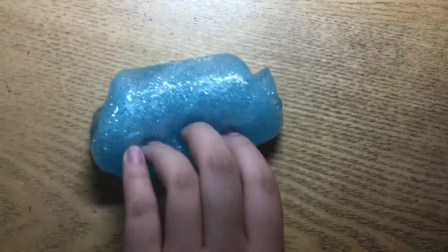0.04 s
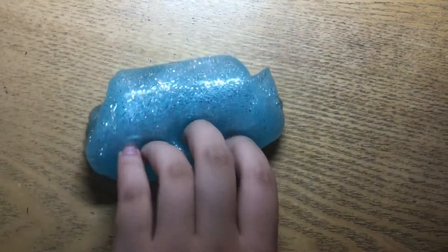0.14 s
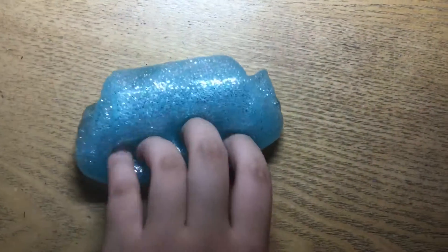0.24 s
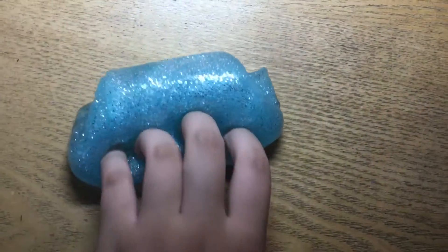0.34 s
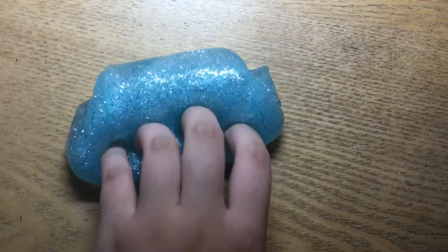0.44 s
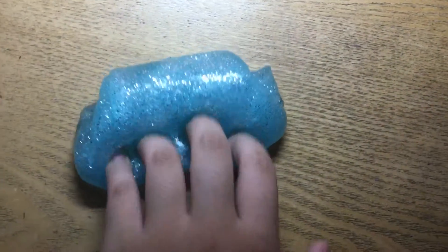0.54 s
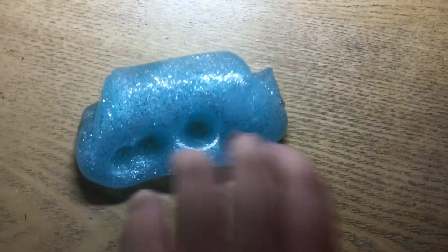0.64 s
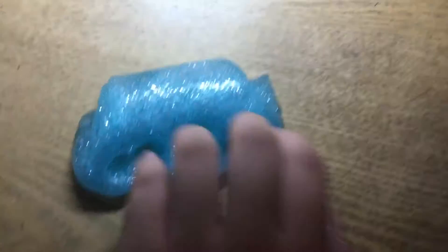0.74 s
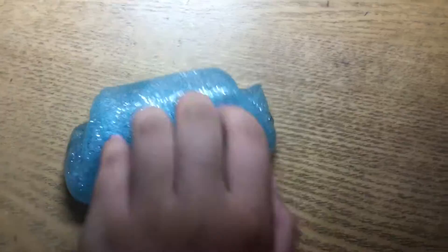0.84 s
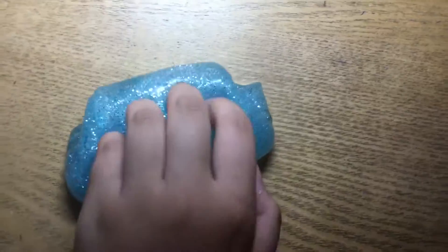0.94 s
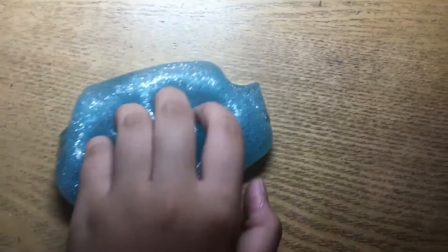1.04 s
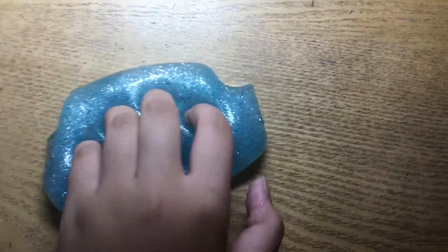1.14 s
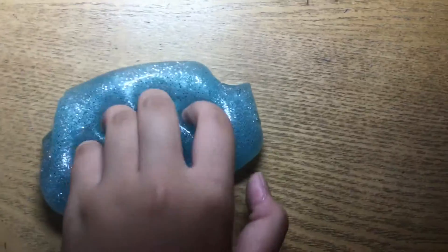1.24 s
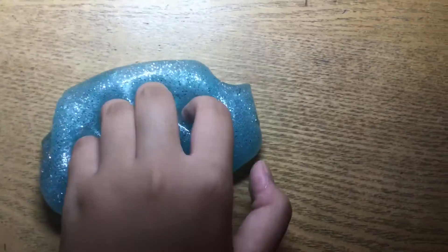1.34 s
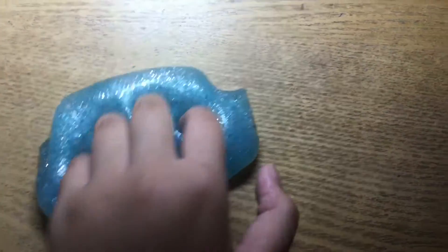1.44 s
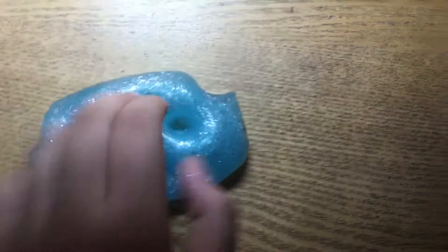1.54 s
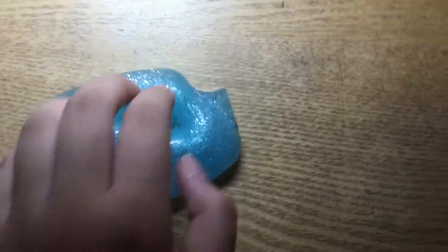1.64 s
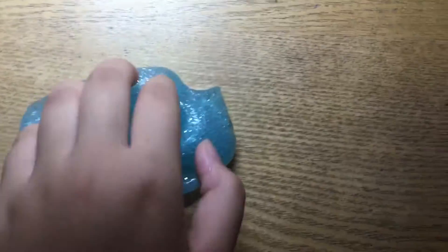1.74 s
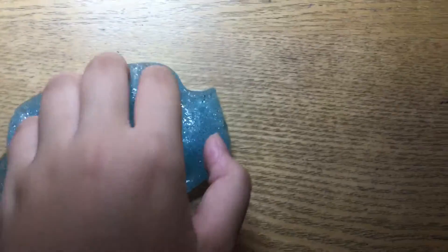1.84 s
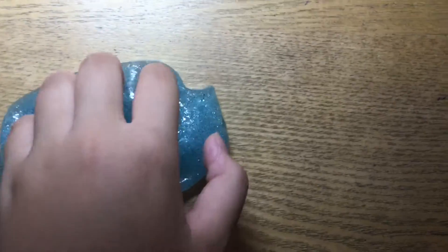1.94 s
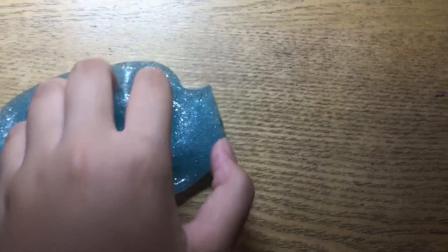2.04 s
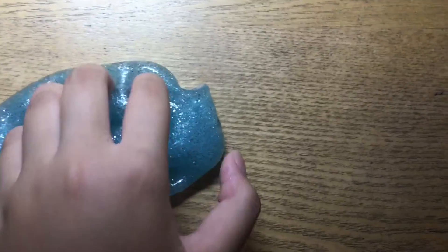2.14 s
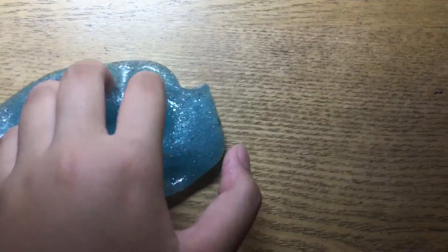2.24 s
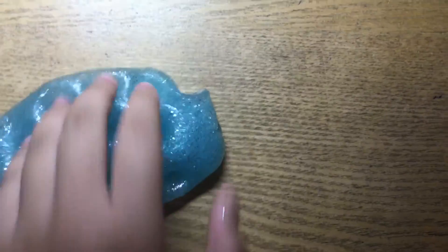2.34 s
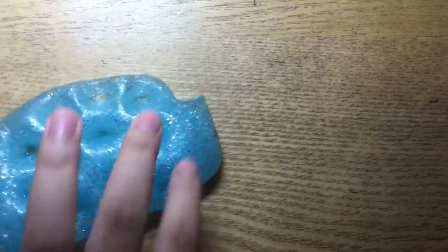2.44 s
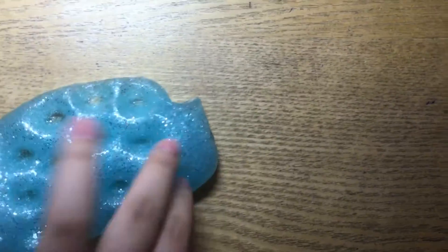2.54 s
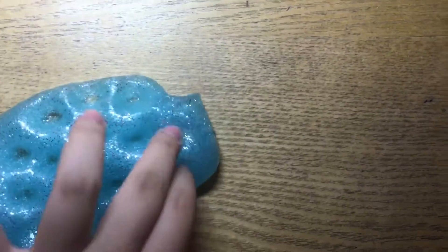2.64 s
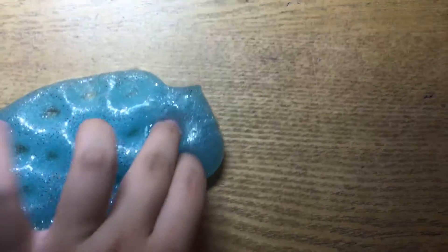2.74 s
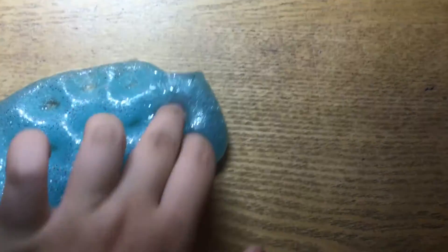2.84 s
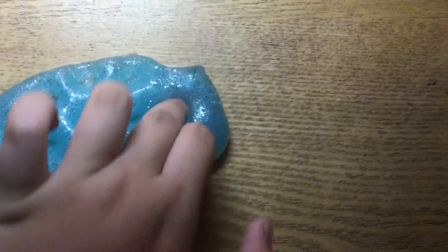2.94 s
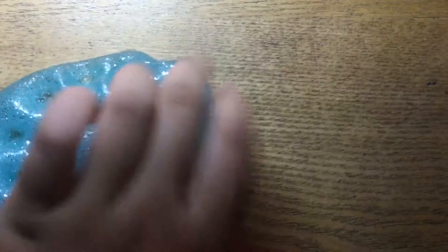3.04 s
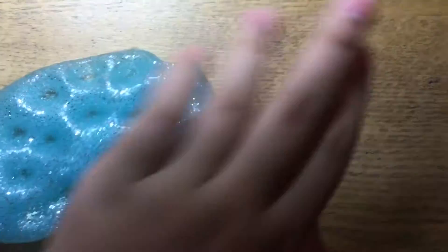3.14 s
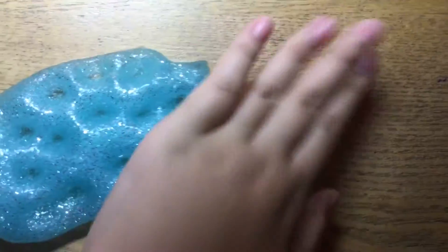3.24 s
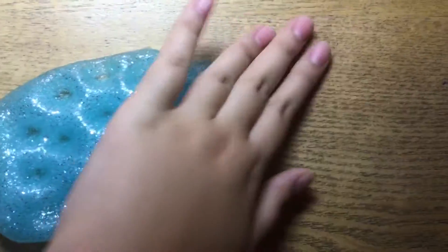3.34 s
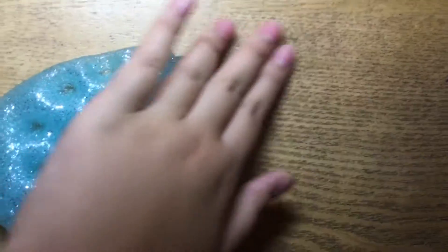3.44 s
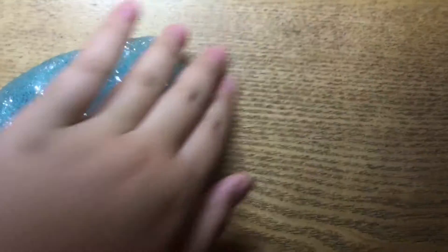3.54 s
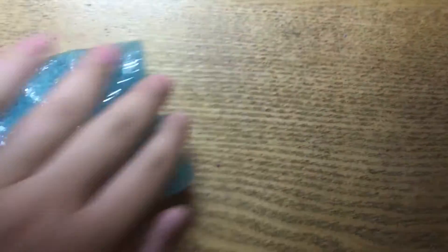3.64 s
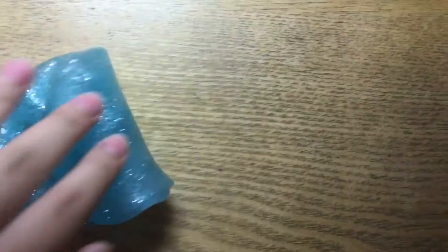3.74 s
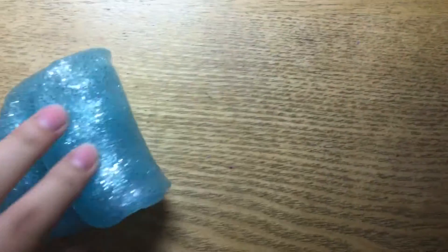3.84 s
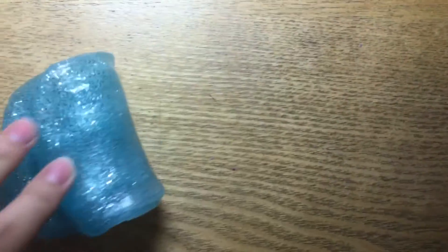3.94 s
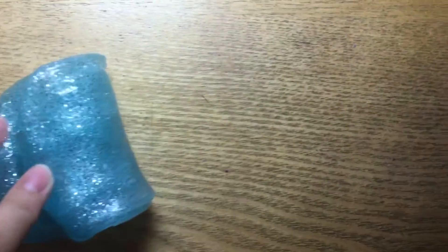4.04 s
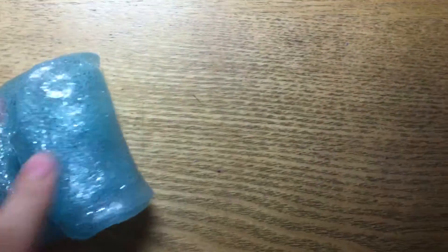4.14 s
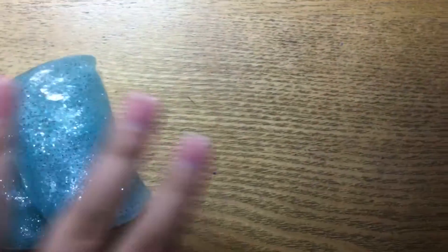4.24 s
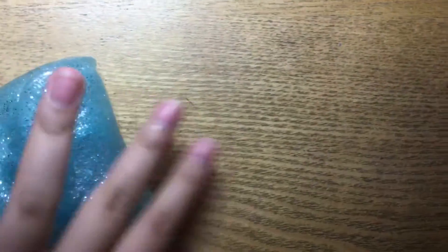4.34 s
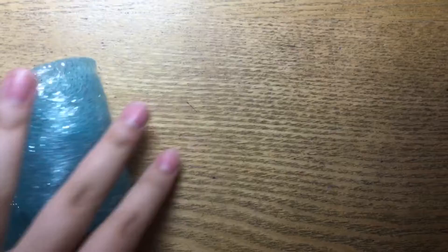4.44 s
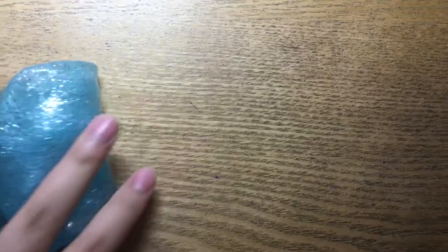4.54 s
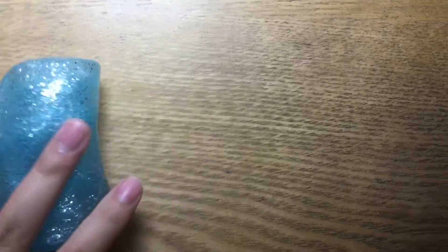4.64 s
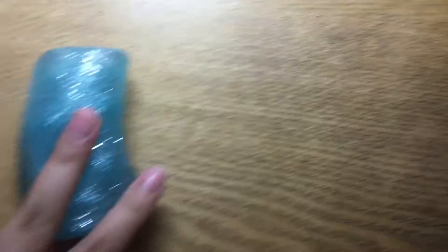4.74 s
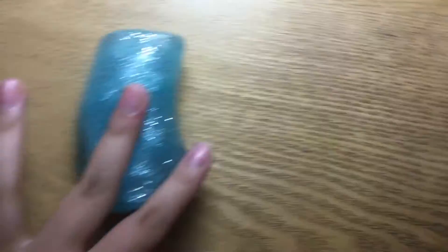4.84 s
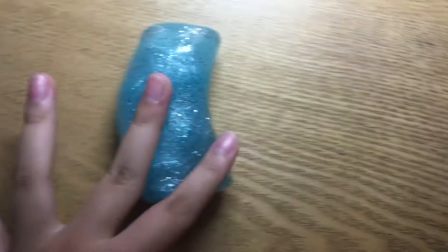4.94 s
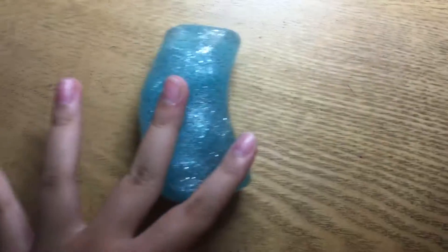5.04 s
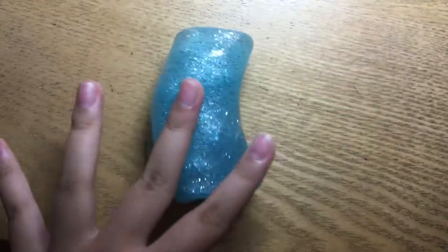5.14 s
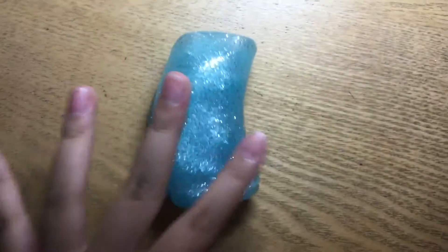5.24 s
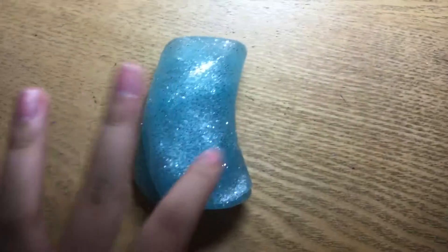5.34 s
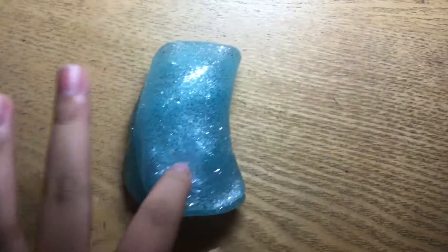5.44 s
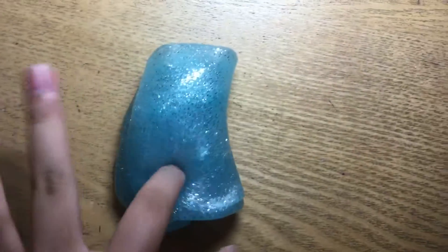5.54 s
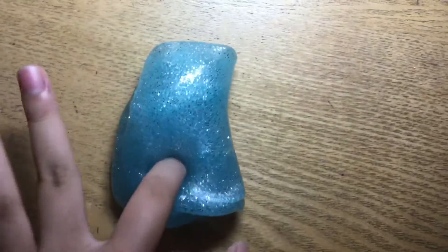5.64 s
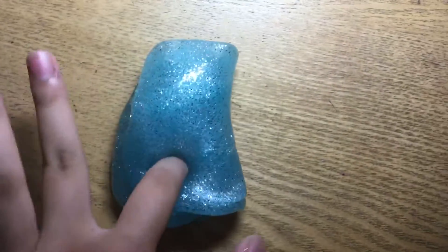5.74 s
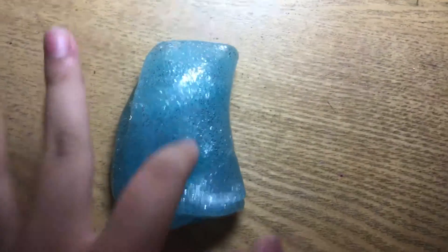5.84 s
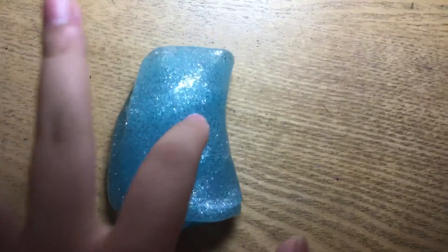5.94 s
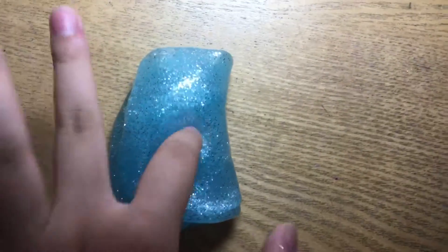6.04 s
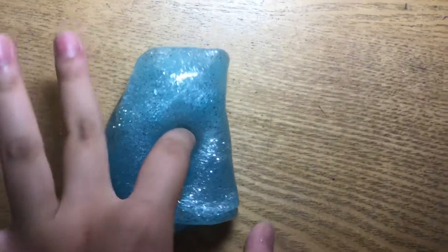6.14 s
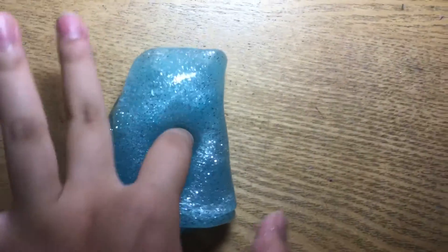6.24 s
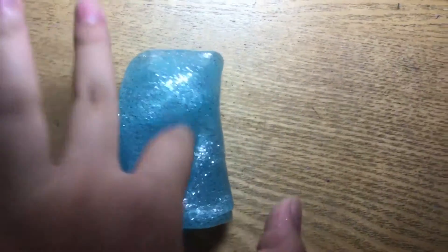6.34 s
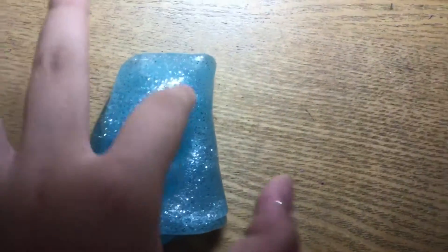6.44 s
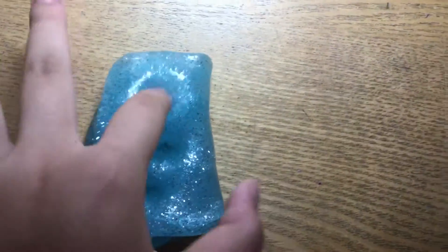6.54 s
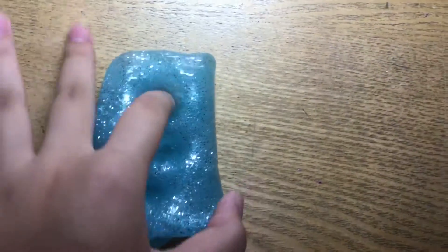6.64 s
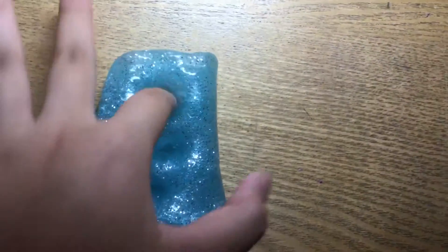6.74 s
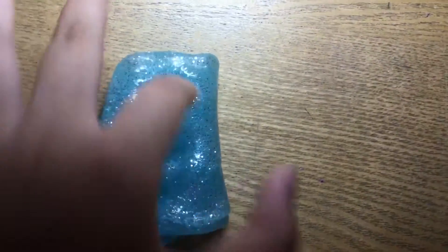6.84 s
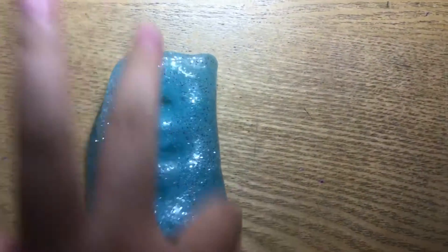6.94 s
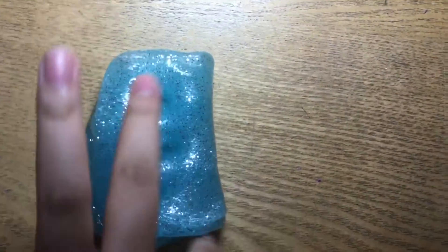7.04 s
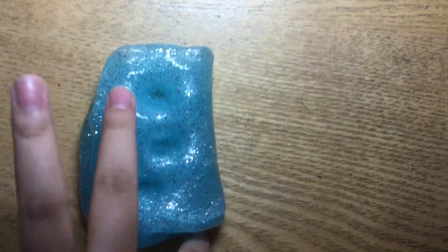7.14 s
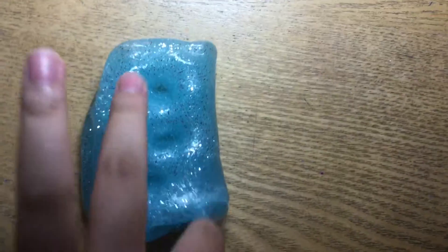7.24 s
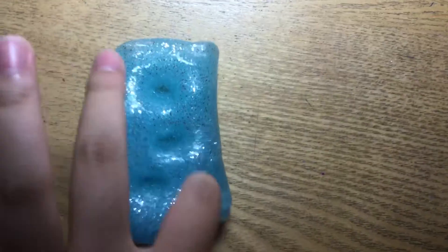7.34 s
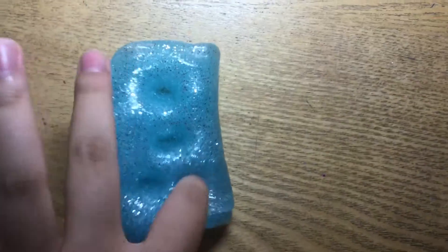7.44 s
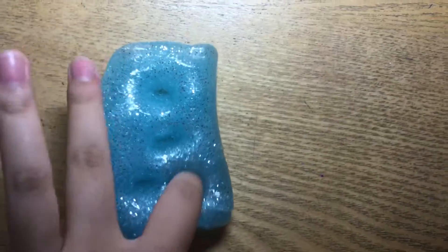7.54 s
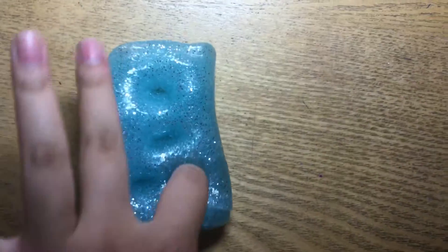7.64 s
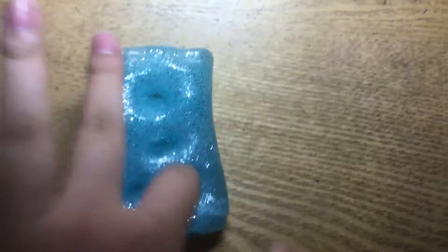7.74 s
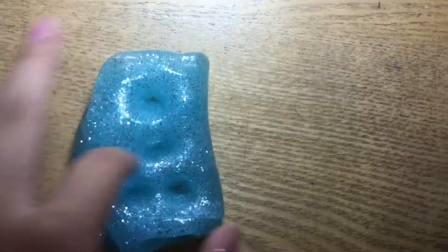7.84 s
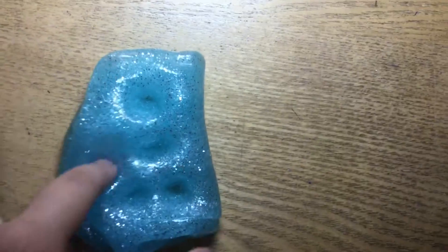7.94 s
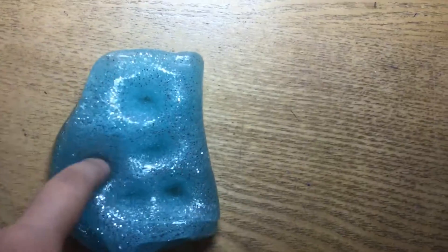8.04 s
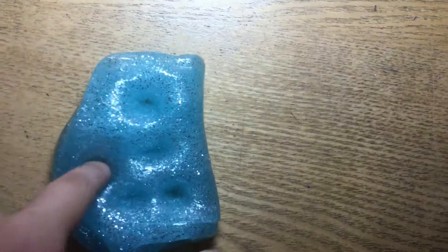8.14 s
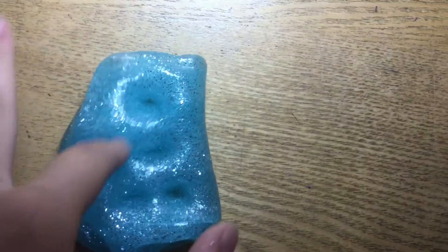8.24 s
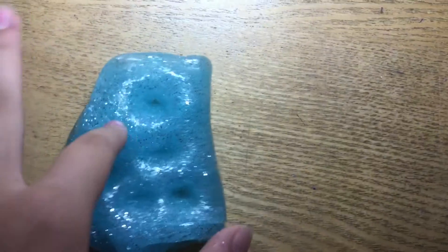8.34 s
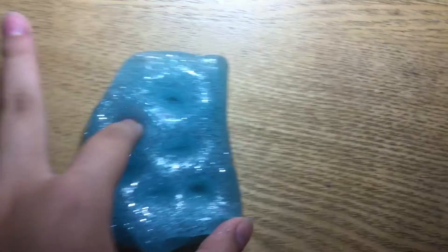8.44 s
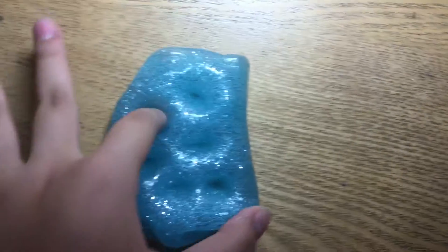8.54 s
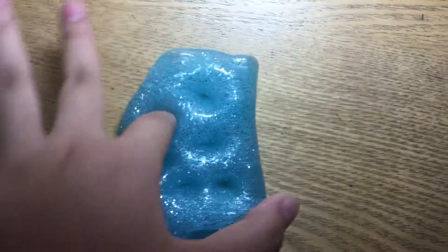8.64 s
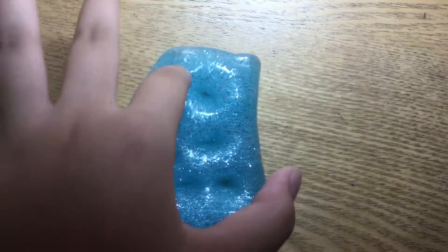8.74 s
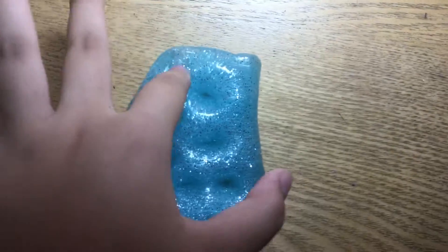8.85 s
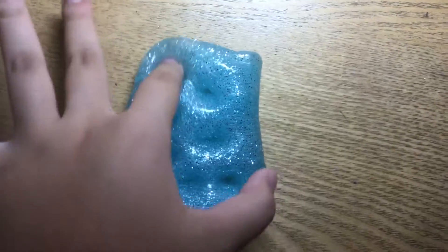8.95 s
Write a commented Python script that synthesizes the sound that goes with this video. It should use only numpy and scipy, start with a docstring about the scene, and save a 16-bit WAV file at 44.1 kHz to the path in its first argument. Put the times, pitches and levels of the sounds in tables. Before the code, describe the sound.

Sticky slime is poked by fingertips on a tabletop in a small, quiet room. Sharp clicks, tiny wet tears and plucky air pops burst out as fingers pull free, with dull skin smacks and soft low knocks between them. Midway the pops stop for handling thumps and fine sticky crackle, then a faint thin whistle precedes more isolated pops. The microphone is very near, with low room noise and weak hum behind.

```python
"""Slime poking on a table.

Fingers poke sticky slime on a wooden table in a small quiet room, close to the microphone.
Presses, knocks and recoil thud softly (damped sines, low rumble); skin smacks (noisy patter) and peels
in faint ticks. Pulling out snaps threads (filtered clicks), tears the wet seal (shaped grains) and pops air
pockets (sinking resonances). A thin whistle leaks out; an appliance hums (wavering sines) over room noise."""
import sys
import numpy as np
from scipy import signal
from scipy.fft import rfft, irfft
from scipy.io import wavfile

SR = 44100
rng = np.random.default_rng(int(sys.argv[2]) if len(sys.argv) > 2 else 0)


def wrap_up_sound(samples):
    """Save the sound to the file named by the first command line argument, as 16-bit audio."""
    columns = np.atleast_2d(samples).T
    # keep every value between -1 and 1, then stretch to whole-number steps
    tamed = np.clip(columns, -1, 1)
    steps = np.round(tamed * 32767).astype(np.int16)
    wavfile.write(sys.argv[1], SR, steps)


N = 396900


def from_db(db):
    """Decibels to amplitude factor."""
    return 10 ** (np.asarray(db) / 20)


def rms_one(x):
    """Scale to rms 1."""
    return x / np.sqrt(np.mean(x ** 2) + 1e-20)


def seconds(length_s):
    """Time axis from 0."""
    return np.arange(int(length_s * SR)) / SR


def add(track, start_s, sound):
    """Mix a sound into the track from start_s on."""
    at = max(round(start_s * SR), 0)
    track[at:at + len(sound)] += sound[:max(N - at, 0)]


def cut(x, hz, kind, order=2):
    """Butterworth filter."""
    sos = signal.butter(order, np.clip(hz, 10, .45 * SR), kind, fs=SR, output="sos")
    return signal.sosfilt(sos, x + 1e-18)   # offset avoids denormals


def at_hz(rows, hz, axis=1):
    """Read one table column on a log-frequency axis."""
    rows = np.array(rows)
    return np.interp(np.log(np.maximum(hz, 1)), np.log(rows[:, 0]), rows[:, axis])


def drift(per_s):
    """Smooth random wander of spread about 1."""
    knots = rng.standard_normal(int(per_s * N / SR) + 2)
    smooth = signal.resample(knots, len(knots) * 16)
    return np.interp(np.linspace(0, len(smooth) - 1, N), np.arange(len(smooth)), smooth)


def grains(size, per_s, spread_db):
    """Random clicks of uneven strength and random sign."""
    strength = from_db(spread_db * np.minimum(rng.exponential(1, size), 3))
    return (rng.random(size) < per_s / SR) * strength * rng.choice([-1, 1], size)


def swells(rows, rest_db=-200):
    """Gain over time: bells at (t/s, level/dB, half-length/s), power-summed with a resting level."""
    t = np.arange(N) / SR
    power = from_db(rest_db) ** 2
    for peak_s, db, half_s in rows:
        bell = np.exp(-.5 * np.minimum(((t - peak_s) / half_s) ** 2, 100))
        power = power + (from_db(db) * bell) ** 2
    return np.sqrt(power)


def glide_filter(x, hz, width_hz):
    """Resonance of gain 1 with a moving centre: shift to 0 Hz, low-pass, shift back."""
    turn = np.exp(2j * np.pi * np.cumsum(hz) / SR)
    r = np.exp(-np.pi * width_hz / SR)
    return 2 * np.real(turn * signal.lfilter([1 - r], [1, -r], x / turn))


# room noise spectrum, relative: f/Hz, density/dB per Hz
ROOM_NOISE = [(20, -35.5), (50, -16.5), (130, -6), (200, 0), (285, -15.5), (350, -8.5), (520, -23),
              (660, -14.5), (880, -18.5), (1130, -18), (2500, -33.5), (7500, -44.5), (8800, -45.5),
              (16000, -51.5)]
# appliance partials before waver and swell: f/Hz, level/dB rms
HUM_PARTIALS = [(166.9, -63.5), (366, -75)]
# hum gain: t/s, level/dB
HUM_GAIN = [(0, 3.5), (1.2, 1), (3.1, 5), (3.6, -12), (4.8, -3), (7, 0.5), (9, 1)]


def background(air_db=-56, waver_db=4.5, wander_rad=0.98):
    """Steady spectrum-shaped room noise plus appliance sines wavering in level and phase."""
    shape = from_db(at_hz(ROOM_NOISE, np.fft.rfftfreq(N, 1 / SR)))
    air = irfft(rfft(rng.standard_normal(N)) * shape, N)
    t = np.arange(N) / SR
    hum = 0
    for hz, db in HUM_PARTIALS:
        level = from_db(db + waver_db * drift(4.7))
        hum = hum + level * np.sin(2 * np.pi * hz * t + wander_rad * drift(12))
    hum_gain = np.sqrt(2) * from_db(np.interp(t, *np.transpose(HUM_GAIN)))
    return from_db(air_db) * rms_one(air) + hum_gain * hum


# slime peeling and folding: peak t/s, level/dB, half-length/s
PEEL_GESTURES = [(3.56, -75, 0.046), (3.745, -74.5, 0.063), (3.93, -77.5, 0.039), (4.05, -78, .03),
                 (4.69, -74, 0.036), (5.29, -76, 0.028), (7.39, -78.5, 0.1)]


def peeling(per_s=1100, width=0.35, clump_db=2.5, rest_db=-89):
    """Skin and slime part in faint ticks, each bubble in one of five bands; it never quite stops."""
    clicks, dealt = grains(N, per_s, spread_db=5.5), rng.integers(0, 5, N)
    ticks = 0
    for k, hz in enumerate(np.geomspace(2500, 11500, num=5)):
        band = cut(clicks * (dealt == k), [hz, hz * (1 + width)], "band", order=1)
        ticks = ticks + band / np.sqrt(hz)
    clumped = ticks * from_db(clump_db * drift(35))   # sticks and lets go by turns
    return swells(PEEL_GESTURES, rest_db) * rms_one(clumped)


# hand leaning on the table: peak t/s, level/dB before rumble_db, half-length/s
HAND_PUSHES = [(.44, -52.5, .07), (1.67, -55, 0.042), (2.28, -51, .03), (2.5, -48.5, .06), (3.08, -47, .06),
               (3.32, -45.5, 0.046), (3.52, -50, 0.033), (4.56, -50, .09), (4.71, -46.5, 0.02),
               (5.08, -50, 0.083), (5.53, -46.5, 0.053), (6.31, -45.5, .025), (7.24, -43.5, 0.035),
               (7.71, -44, 0.048), (8.16, -48.5, 0.11), (8.26, -45, 0.023), (8.67, -47.5, 0.037)]


def rumble(low_hz=48, top_hz=135, rumble_db=-3, lumpy_db=2.5, rest_db=-58.5):
    """Kneading shakes the table top in its lowest range: band noise, lumpy in level."""
    lumpy = rng.standard_normal(N) * from_db(lumpy_db * drift(14))
    shake = rms_one(cut(lumpy, [low_hz, top_hz], "band"))
    return from_db(rumble_db) * swells(HAND_PUSHES, rest_db) * shake


# fingertips meeting the wet surface: t/s, level/dB before decay, top f/Hz
SKIN_SMACKS = [(0.273, -48.5, 2500), (.474, -53, 1450), (2.281, -54, 2500), (2.926, -48.5, 1580),
               (3.110, -39.5, 1300), (5.044, -55.5, 3465), (5.787, -54.5, 1000), (6.295, -56, 1000),
               (6.764, -53, 1300), (7.229, -45.5, 1250), (7.676, -48, 897)]


def smacks(per_s=5000, t60_s=0.057, low_hz=340):
    """Skin sticks down in a brief dull patter of tiny contacts."""
    out, t = np.zeros(N), seconds(0.061)
    for start_s, db, top_hz in SKIN_SMACKS:
        contacts = cut(grains(len(t), per_s, spread_db=4.0), low_hz, "high", order=3)
        patter = rms_one(cut(contacts, top_hz, "low"))
        add(out, start_s, from_db(db - 60 * t / t60_s) * patter)
    return out


# threads and tiny bubbles snapping: t/s, level/dB, lowest f/Hz
THREAD_SNAPS = [(.382, -32.5, 8000), (0.7062, -6.5, 6030), (.7094, -3, 5500), (.713, -4.5, 6000),
                (.721, -9.5, 4000), (1.618, -16.5, 3000), (1.6281, -11, 5000), (1.634, -12, 3000),
                (2.223, -27, 2000), (2.443, -24, 4000), (2.458, -19, 4000), (2.4654, -5, 1500),
                (2.966, -33.5, 9000), (3.033, -41, 9000), (3.115, -31, 2000), (3.1374, 2, 6000),
                (4.072, -38.5, 5800), (5.316, -38, 10000), (5.754, -38.5, 5960), (5.9617, -3, 2500),
                (5.9652, -0.5, 4500), (6.298, -35, 4000), (6.482, -6, 2000), (6.747, -40, 6900),
                (6.9386, -12, 4000), (6.9427, -6.5, 2530), (7.871, -12, 4000), (7.8768, -8.5, 4000),
                (8.352, -10, 4000), (8.63, -37.5, 9000), (8.8121, -9, 5500)]


def snaps(span=26.0, strays_per_tear=3, stray_db=4, stray_s=.005, stray_hz=5000, tick_db=2, tick_hz=1201):
    """A breaking thread is one sharp band-limited click; thinner threads sit higher."""
    out, click = np.zeros(N), signal.unit_impulse(256)
    events = list(THREAD_SNAPS)
    for peak_s, db, *_ in SEAL_TEARS:   # weaker threads scattered around each tear
        for _ in range(strays_per_tear):
            events.append((peak_s + stray_s * rng.uniform(-1, 1), db + stray_db, stray_hz))
    for start_s, db, _ in SKIN_SMACKS:   # fine tick at each smack onset
        events.append((start_s, db + tick_db, tick_hz))
    for start_s, db, low_hz in events:
        sound = cut(click, low_hz, "high")
        sound = cut(sound, min(low_hz * span, 19000), "low", order=1)
        add(out, start_s, from_db(db) * sound / np.linalg.norm(sound))
    return out


# soft low thuds through the table (fingertips landing, hand presses and knocks, recoil at pops):
# t/s, f/Hz, level/dB before thud_db
TABLE_THUDS = [(0.407, 143, -36.5), (2.219, 226, -37.5), (2.941, 184.6, -35.5), (3.044, 140, -38),
               (3.135, 208, -40), (3.305, 118.3, -35.5), (3.323, 165, -33), (4.517, 147, -34),
               (4.578, 99.7, -33), (4.59, 112, -31.5), (5.048, 173, -39), (5.304, 90, -31),
               (5.441, 79.5, -39), (5.788, 169, -35), (5.964, 197, -33.5), (6.295, 150, -32),
               (6.485, 193, -36.5), (7.23, 116, -38), (7.234, 344, -42.5), (7.676, 153, -33),
               (7.892, 151, -36), (8.825, 176, -39)]


def thuds(contact_s=0.0026, t60_s=0.064, table_hz=68, table_t60_s=0.056, table_db=-9, thud_db=5):
    """A soft push or recoil dies within a few cycles and rocks the table top below it."""
    out, t = np.zeros(N), seconds(.2)
    table = from_db(table_db - 60 * t / table_t60_s) * np.sin(2 * np.pi * table_hz * t)
    onset = 1 - np.exp(-t / contact_s)
    for start_s, hz, db in TABLE_THUDS:
        thud = from_db(-60 * t / t60_s) * np.sin(2 * np.pi * hz * t)
        add(out, start_s, from_db(db + thud_db) * onset * (thud + table))
    return out


# wet seal tearing: peak t/s, level/dB, swell/s, fade/s, tilt/dB per octave, gap f/Hz at the peak
SEAL_TEARS = [(0.72, -30, 0.0065, 0.011, 2, 4840), (.736, -28, 0.012, 0.0047, -1.5, 1250),
              (1.6175, -29, 0.0012, 0.0087, 2, 1110), (1.643, -27.5, 0.0069, 0.0067, -1, 980),
              (1.661, -27, 0.0017, 0.0057, -3.5, 1150), (2.225, -39.5, 0.0023, 0.0057, -2, 1910),
              (2.467, -31.5, 0.0073, 0.0042, -2, 1790), (2.475, -25, 0.0062, 0.0062, -2.8, 1810),
              (3.133, -37.5, .003, 0.0035, -2.5, 6700), (3.138, -20, 0.0008, 0.008, 4, 13000),
              (5.962, -26.5, 0.0013, 0.0035, -3, 1723), (6.476, -35, .002, 0.0055, -0.5, 5200),
              (6.4818, -25.5, 0.0035, 0.0043, -2.5, 1060), (6.9442, -28.5, 0.0048, 0.0041, -3.5, 1250),
              (7.871, -39, 0.0033, 0.0032, 1, 6020), (7.876, -34, 0.0023, 0.0069, -3.5, 1420),
              (8.354, -33, 0.0041, 0.0027, 0.5, 1036), (8.363, -33.5, 0.0014, 0.0026, -1, 800),
              (8.812, -32, 0.00078, 0.0054, -2.5, 1600)]


def tears(per_s=4500, low_hz=420, pivot_hz=5000, creep_db=-21, creep_s=0.012, octaves_per_s=32,
          width=0.15, gap_db=2):
    """The seal creeps, then gives way in a rush of microscopic ruptures; thin films sound brighter."""
    out, t = np.zeros(N), seconds(.1) - .05   # 0 = peak
    octaves = np.log2(np.clip(np.fft.rfftfreq(len(t), 1 / SR), 1500, 14000) / pivot_hz)
    creep = from_db(creep_db) * np.exp(-abs(t) / creep_s) * (t < 0)
    for peak_s, db, swell_s, fade_s, tilt_db, gap_hz in SEAL_TEARS:
        ruptures = grains(len(t), per_s, spread_db=3.5)
        fizz = irfft(rfft(ruptures) * from_db(tilt_db * octaves), len(t))
        pitch_hz = np.minimum(gap_hz * 2 ** (-octaves_per_s * t), SR / 3)   # widening gap: falling pitch
        fizz = fizz + from_db(gap_db) * glide_filter(fizz, pitch_hz, width * gap_hz)
        rush = np.exp(-np.maximum(-t / swell_s, t / fade_s))
        level = from_db(db) * np.maximum(rush, creep)
        add(out, peak_s + t[0], level * rms_one(cut(fizz, low_hz, "high")))
    return out


# air pockets opening: t/s, mid-glide cavity f/Hz, level/dB, base t60/s
AIR_POCKETS = [(0.7341, 714, -31, 0.045), (1.618, 715, -33.5, 0.048), (1.6422, 743, -24, 0.039),
               (1.6596, 648, -30, 0.034), (2.224, 803, -45.5, .06), (2.464, 1867, -22, 0.026),
               (2.472, 1930, -23.5, 0.027), (2.478, 1170, -28, 0.033), (3.137, 1330, -31.5, 0.027),
               (3.1373, 720, -34.5, 0.022), (5.963, 660, -17, .021), (5.964, 472, -25.5, .03),
               (5.963, 3200, -22.5, .018), (6.481, 746, -21.5, 0.032), (6.939, 767, -28.5, 0.05),
               (6.9425, 1955, -30.5, .027), (7.875, 830, -32.5, 0.023), (8.3535, 692, -23.5, 0.025),
               (8.812, 749, -25.5, 0.026)]
# modes of every pocket: multiple of cavity f, level/dB, share of base t60
CAVITY_MODES = [(.68, -7, 0.74), (1.0, 2, 0.96), (1.58, -6, 0.74)]


def pockets(opening_s=0.00092, glide=0.076, slab_hz=400, slab_db=-17, slab_t60_s=0.027, overtone_hz=800):
    """Each pocket rings as a small air resonator whose pitch sinks while the finger draws away."""
    out, t = np.zeros(N), seconds(.1)
    recoil = from_db(slab_db - 60 * t / slab_t60_s) * np.sin(2 * np.pi * slab_hz * t)
    onset = 1 - np.exp(-t / opening_s)
    for start_s, hz, db, t60_s in AIR_POCKETS:
        pitch_hz = hz * (1 + glide * (2 * np.exp(-t * 8 / t60_s) - 1))
        phase = 2 * np.pi * np.cumsum(pitch_hz) / SR
        overtone = min((overtone_hz / hz) ** 2, 1)   # weak in small, high pockets
        ring = 0
        for multiple, mode_db, share in CAVITY_MODES:
            gain = overtone if multiple > 1 else 1
            decay = from_db(mode_db - 60 * t / (t60_s * share))
            ring = ring + gain * decay * np.sin(multiple * phase)
        size = (2 * slab_hz / hz) ** 2   # big, low pockets make the slab spring back
        add(out, start_s, from_db(db) * onset * (ring + size * recoil))
    return out


# air squeezed out under a fingertip: peak t/s, level/dB rms, half-length/s
AIR_LEAKS = [(5.79, -77, .02), (5.88, -70, 0.019)]


def whistle(hz=3690, waver=.004):
    """A narrow leak sings on one nearly steady pitch."""
    phase = 2 * np.pi * np.cumsum(hz * (1 + waver * drift(40))) / SR
    return np.sqrt(2) * swells(AIR_LEAKS) * np.sin(phase)


# hollow between hand and slime: f/Hz, width/Hz, level/dB
HAND_HOLLOW = [(1250, 210, -2.5), (3200, 320, -3), (4400, 1300, -7), (8510, 380, -7.5), (11900, 4400, -12),
               (15200, 530, -9)]


def hollow(x):
    """The cupped hand and the dent add their resonances in parallel."""
    out = x.copy()
    for hz, width_hz, db in HAND_HOLLOW:
        b, a = signal.iirpeak(hz, hz / width_hz, fs=SR)
        out += from_db(db) * signal.lfilter(b, a, x + 1e-18)
    return out


def scatter(x, t60_s, echo_db, low_hz=900):
    """Dense early echoes from small surfaces close by; long waves bend round them."""
    t = seconds(.06)
    echoes = rng.standard_normal(len(t)) * from_db(-60 * t / t60_s) * (t > 0)
    echoes = cut(echoes / np.linalg.norm(echoes), low_hz, "high")
    return x + from_db(echo_db) * signal.fftconvolve(x, echoes)[:N]


# room tail: f/Hz, t60/s, level/dB
ROOM_TAIL = [(150, 0.1, -15.5), (400, 0.21, -5.5), (800, 0.35, -7), (2000, 0.35, -11), (5500, 0.36, -19),
             (14000, 0.31, -18.5)]


def room(x, build_s=0.005):
    """Diffuse tail that builds up briefly and dies band by band."""
    t, tail, edges_hz = seconds(.6), 0, np.geomspace(70, 18000, num=9)
    for low_hz, high_hz in zip(edges_hz, edges_hz[1:]):
        hz = np.sqrt(low_hz * high_hz)
        decay = from_db(-60 * t / at_hz(ROOM_TAIL, hz)) * (1 - np.exp(-t / build_s))
        band = cut(rng.standard_normal(len(t)), [low_hz, high_hz], "band")
        level = from_db(at_hz(ROOM_TAIL, hz, axis=2))
        tail = tail + level * band * decay / np.linalg.norm(decay)
    return signal.fftconvolve(x, tail)[:N]


def scene(snap_db=-3, tear_db=-2, pocket_db=1, pocket_room_db=-3):
    """Balance the sources, add nearby echoes, room tail and background."""
    clicks = scatter(from_db(snap_db) * snaps(), t60_s=0.0047, echo_db=-8)   # off the fingers
    wet = hollow(clicks + from_db(tear_db) * tears() + peeling()) + smacks() + whistle()
    pops = from_db(pocket_db) * pockets()
    table = thuds() + rumble()
    near = scatter(wet + pops, t60_s=0.028, echo_db=-10) + table   # off the table and the arm
    tail = room(wet + from_db(pocket_room_db) * pops + table)
    return (near + tail + background())[None]


def record(dry, bass_hz=42, cutoff_hz=16100):
    """The microphone sheds deep bass; the top is cut steeply."""
    thin = cut(dry, bass_hz, "high", order=3)
    steep = signal.ellip(10, .1, 70, cutoff_hz, fs=SR, output="sos")   # .1 dB ripple, 70 dB stop
    return signal.sosfilt(steep, thin)


dry = scene()
out = record(dry)
wrap_up_sound(out)
```